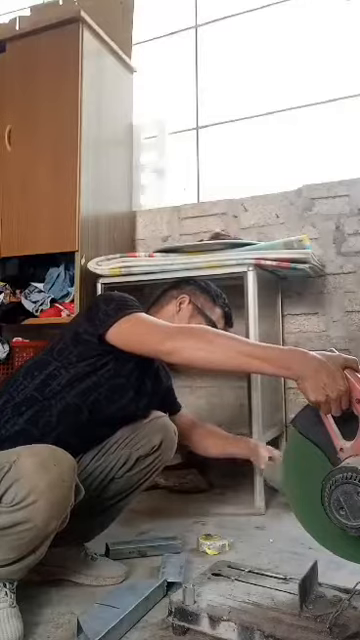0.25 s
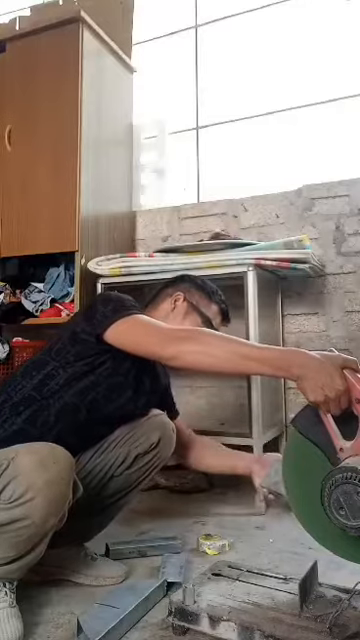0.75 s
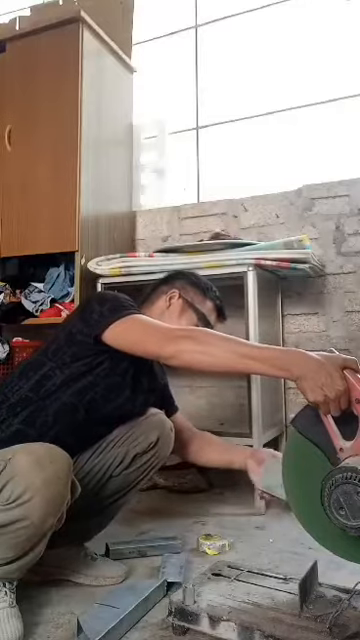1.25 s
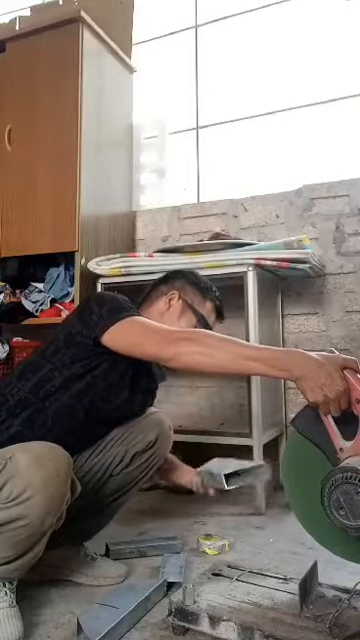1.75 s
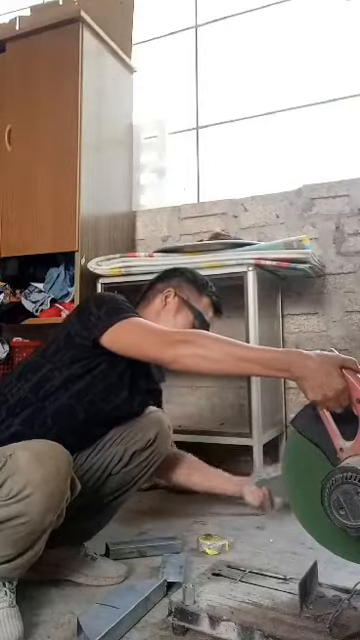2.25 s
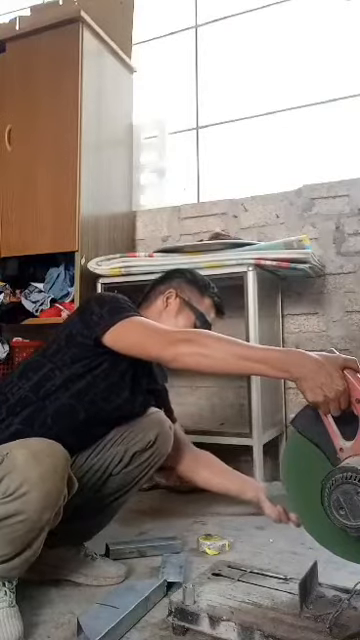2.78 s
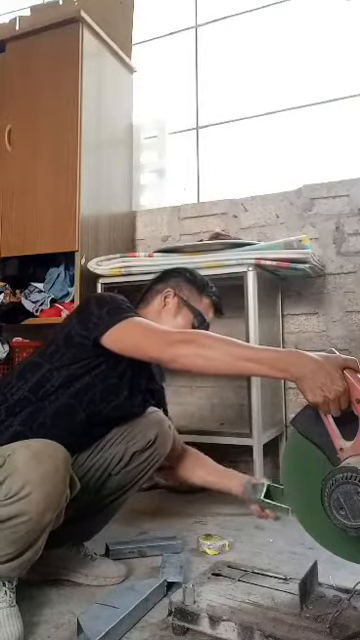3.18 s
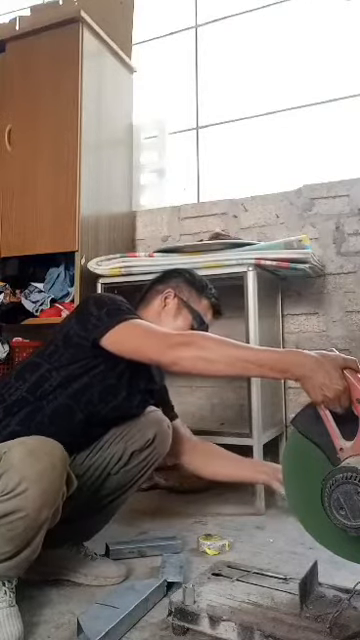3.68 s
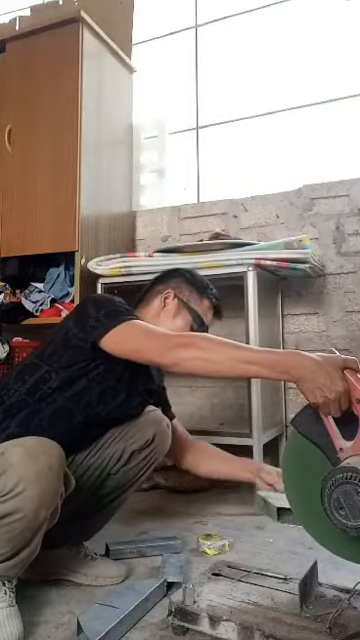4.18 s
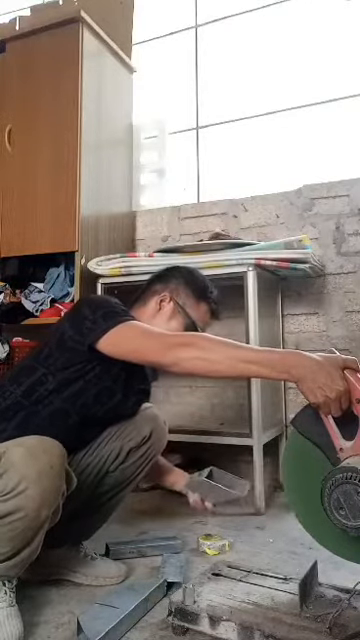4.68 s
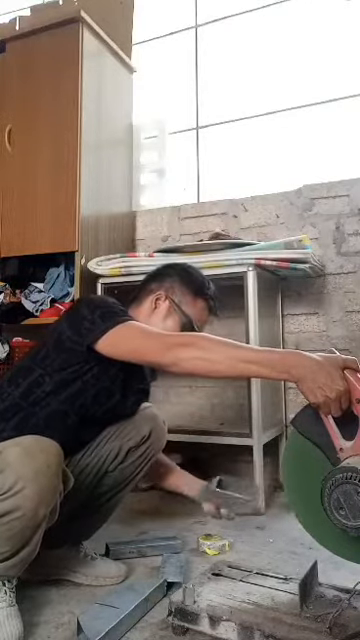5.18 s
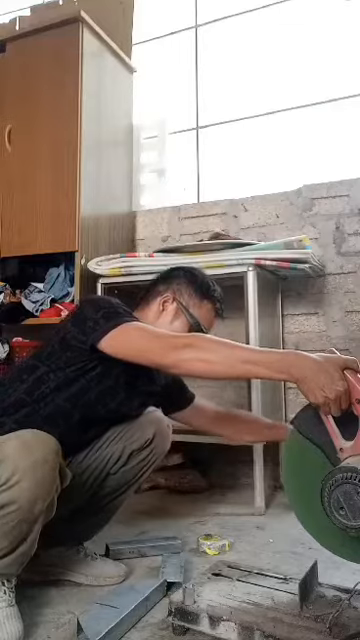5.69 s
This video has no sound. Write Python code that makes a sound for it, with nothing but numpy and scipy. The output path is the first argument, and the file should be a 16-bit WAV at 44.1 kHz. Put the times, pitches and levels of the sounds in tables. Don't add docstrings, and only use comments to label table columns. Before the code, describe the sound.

A steel tube is pressed on a spinning abrasive wheel again and again: bright hissing grit, ringing metal and low buffeting over a rough motor roar. Each release leaves a sinking whine and quick loose clatter; each trigger blip knocks, booms and whines upward. The sound is close, loud, slightly saturated and dull at the very top, with some lossy thinning and uneven stereo.

```python
import sys
import numpy as np
from scipy import signal
from scipy.io import wavfile
from scipy.ndimage import uniform_filter1d

SR = 44100
rng = np.random.default_rng(int(sys.argv[2]) if len(sys.argv) > 2 else 0)


def put_to_file(sound):
    columns = np.atleast_2d(sound).T
    safe = np.clip(columns, -1, 1)
    whole_steps = np.round(safe * 32767)
    wavfile.write(sys.argv[1], SR, whole_steps.astype(np.int16))


def natural_amplitude(level_db):
    exponent = np.asarray(level_db, float) / 20
    return 10 ** exponent


N = 261954
TIME = np.arange(N) / SR


def evened(x):
    return x / np.sqrt(np.mean(x.mean(0) ** 2) + 1e-20)


def steadied(x, size):
    power = uniform_filter1d(x ** 2, size=size)
    return evened(x / (power + .15 * np.mean(x ** 2)) ** .4)


def flicker(count, size):
    return evened(uniform_filter1d(rng.standard_normal((1, count)), size=size))


def read(points, hz):
    f, value = np.transpose(points)
    return np.interp(np.log(hz + 1), np.log(f + 1), value)


def track(rows, column):
    rows = np.array(rows)
    return np.interp(TIME, rows[:, 0], rows[:, column])


def noise(gain, same, lean, patchy_db, size=2048, count=N):
    frames, hz = 4 * count // size + 5, np.fft.rfftfreq(size, 1 / SR)
    a, b, c, d, patches = rng.standard_normal((frames, len(hz), 5)).T
    patches = uniform_filter1d(patches, size=size // 200, axis=0)
    patches = uniform_filter1d(patches, size=12288 // size, axis=1)
    alike = np.clip(read(same, hz), -1, 1)[:, None]
    left = a + 1j * b
    lag = np.exp(-1j * 0.29 * np.minimum(hz / 1000, 1.6))[:, None]
    right = lag * alike * left + np.sqrt(1 - alike ** 2) * (c + 1j * d)
    z = np.array([left, right]) * gain(hz)[:, None] * natural_amplitude(patchy_db * patches / patches.std())
    z = z * natural_amplitude(np.array([.5, -.5])[:, None, None] * read(lean, hz)[:, None])
    return evened(signal.istft(z, nperseg=size, noverlap=3 * size // 4)[1][:, :count])


def modes(table):
    f, width, db = np.transpose(table)
    return lambda hz: np.sqrt((natural_amplitude(2 * db) / (1 + (2 * (hz[:, None] - f) / width) ** 2) ** 1.42).sum(1))


def resonate(x, hz, width):
    turn, r = np.exp(2j * np.pi * np.cumsum(hz) / SR), np.exp(-np.pi * width / SR)
    return 2 * (turn * signal.lfilter([(1 - r) ** 2], [1, -2 * r, r * r], x / turn)).real


# (time [s], peak level [dB], frequency [Hz], T60 [s])
JOLTS = [
    (0.634, -6.5, 466, 0.19),
    (2.202, -8, 465, 0.44),
    (3.65, -6.5, 459, 0.28),
    (5.867, -7, 461, 0.19),
]


def surge():
    rows = np.array(JOLTS)
    lead_s, rise_s = 0.019, 0.011
    since = np.maximum(TIME - rows[:, :1] + lead_s, 0)
    length = 0.24 * rows[:, 3:] / 0.21
    return ((1 - np.exp(-since / rise_s)) * np.exp(-(since / length) ** 2)).sum(0)


# (time [s], lift over the resting rattle [dB])
CLASHES = [(0.414, -1.0), (0.467, 0.5), (0.534, -6.5), (0.572, -2.5), (0.614, 5.5), (0.673, -3.5),
           (0.8, -4.0), (0.868, 8.5), (1.759, 1.5), (1.814, 3.5), (1.88, 9.0), (1.932, 4.0), (2.005, 5.0),
           (2.064, 2.5), (2.118, 5.0), (2.19, 3.5), (2.247, -6.0), (2.305, -3.5), (2.379, -0.5),
           (2.459, 4.0), (2.518, 2.5), (2.571, 5.0), (2.628, 2.5), (2.7, 3.5), (2.753, 3.0), (3.433, 1.5),
           (3.493, 2.5), (3.554, 3.5), (3.634, 5.5), (3.699, -5.0), (4.44, 7.0), (4.496, 6.5), (4.551, 9.5),
           (4.606, -1.0), (4.655, 4.0), (4.712, 5.5), (4.764, 6.5), (4.817, 4.5), (4.885, 1.5),
           (4.933, 5.0), (4.987, 4.5), (5.031, 1.0), (5.077, 1.5), (5.138, -1.0), (5.193, 4.0),
           (5.257, 5.5), (5.31, 1.0), (5.375, 3.5), (5.417, -1.0), (5.475, 1.5), (5.554, 1.0), (5.616, 4.0),
           (5.665, 1.0), (5.705, 2.5), (5.765, 2.5), (5.81, 1.0), (5.853, 4.0)]


def rattle():
    rest, lift_gain = 0.67, 0.53
    t, hits = np.arange(4000) / SR, np.zeros(N)
    s, db = np.transpose(CLASHES)
    hits[(s * SR).astype(int)] = natural_amplitude(db)
    lift = signal.oaconvolve(hits, (1 - np.exp(-t / 0.003)) * np.exp(-(t / 0.026) ** 2))[:N]
    gain = rest + lift_gain * lift
    return gain / np.sqrt(uniform_filter1d(gain ** 2, size=8000))


# (frequency [Hz], density [dB per Hz])
RUMBLE = [(15, -53), (25, -53), (64, -6), (111, 3), (291, 3.5), (420, 6), (550, -59), (920, -120)]
# (time [s], load [0-1])
LOAD = [(0, 0.49), (.23, 0.61), (.45, 0), (.95, 0), (1.07, 0.69), (1.27, 0.53), (1.36, 0.84), (1.58, 1),
        (1.68, 0), (2.7, 0.5), (2.85, 0.62), (3.1, 0.67), (3.3, 0.68), (3.55, 0.4), (3.8, 0.65),
        (3.96, 0.85), (4.37, 0.76), (4.46, 0.09)]
# (frequency [Hz], left-right difference [dB])
LEAN = [(100, 0), (420, 3), (860, -2), (1400, 1.5), (3000, 4), (5000, 6.5), (6030, 13.5), (7300, 10.5),
        (7950, -2), (8600, -6), (9500, -12), (11000, 14.5)]


def rumble():
    sound = noise(lambda hz: natural_amplitude(read(RUMBLE, hz)), [(60, .2), (400, .15)], LEAN, patchy_db=3.5, size=4096)
    return sound * natural_amplitude(-73.5 + np.maximum(39.5 * track(LOAD, 1), 28 * surge()))


def strain_db():
    return 5 * track(LOAD, 1) + 3.5 * surge()


# (frequency [Hz], density [dB per Hz])
ROAR = [(25, -76), (45, -49), (108, -23.5), (355, -19), (480, -6), (1010, -8.5), (1500, -7), (1900, -9),
        (3380, -6.5), (6050, -8), (7100, -13), (8000, -23.5), (8700, -18), (9800, -31.5), (13100, -65.5)]
# (frequency [Hz], left-right likeness [-1 to 1])
SAME = [(60, 1), (180, 0.96), (510, 0.52), (1490, 0.049), (4350, 0.21), (12700, -0.24)]


def roar():
    sound = noise(lambda hz: natural_amplitude(read(ROAR, hz)), SAME, LEAN, patchy_db=2.0)
    return sound * natural_amplitude(-29.5 + strain_db()) * natural_amplitude(1.3 * flicker(N, 70))


# (frequency [Hz], width [Hz], level [dB])
BASE = [(410, 30, -10), (463, 22, 0), (560, 50, -9), (631, 22, -3), (845, 16, -12), (929, 14, -7),
        (1080, 35, -12)]
# (frequency [Hz], left-right likeness [0-1])
GUARD_SAME = [(400, 1), (1000, 0.82), (1600, 0.51), (3000, 0.52)]
# (time [s], contact [dB])
CONTACT = [(0, 0), (.6, -2), (.82, -3.5), (.89, 3.5), (.95, -1.5), (1.08, 5), (1.3, -12.5), (1.6, -0.5),
           (1.7, -3.5), (2.2, 5), (2.4, -3.5), (2.55, 5), (2.85, 8.5), (3.12, 5), (3.85, 2), (4.3, -0.5),
           (4.46, 4), (5.0, 0.5)]
BOOM_HOLD_S = .05


def drone():
    sound = noise(modes(BASE), GUARD_SAME, LEAN, patchy_db=5.0, size=4096)
    sound = sound / (uniform_filter1d(sound.mean(0) ** 2, size=2500) + 0.1) ** 0.3
    sound = sound * natural_amplitude(-35 - 8.5 * track(LOAD, 1) + 8.5 * surge() + 0.47 * track(CONTACT, 1))
    since = TIME - np.array(JOLTS)[:, :1]
    taken = np.exp(-((since - BOOM_HOLD_S / 2) / BOOM_HOLD_S) ** 4).sum(0)
    return sound * (1 - .85 * taken)


# (time [s], gear mesh [Hz])
MESH = [(0, 1448), (.61, 1304), (.8, 1669), (1.25, 1553), (1.62, 1436), (2.17, 1362), (2.4, 1662),
        (2.8, 1591), (3.3, 1473), (3.62, 1475), (3.8, 1652), (4.42, 1603), (5.0, 1490), (5.84, 1393),
        (5.94, 1580)]
# (frequency [Hz], width [Hz], level [dB])
GUARD = [(1290, 22, -4), (1358, 24, 1), (1445, 14, -2), (1493, 12, -1), (1554, 14, 1), (1608, 14, 1),
         (1740, 50, -13)]


def whine():
    guard = noise(modes(GUARD), GUARD_SAME, LEAN, patchy_db=4.0, size=4096)
    sound = resonate(guard, track(MESH, 1), 285) + 0.29 * guard
    sound = sound / np.sqrt(uniform_filter1d(sound.mean(0) ** 2, size=4000))
    return sound * natural_amplitude(-32.5 + track(CONTACT, 1) + 1.5 * surge() - 5.5 * track(LOAD, 1))


# (multiple of the mesh [-], width [Hz], coasting level [dB], powered level [dB])
ORDERS = [(.385, 14, -43, -60), (2.0, 90, -52, -43), (2.52, 40, -52, -56)]


def speed_lines(white):
    mesh_hz = track(MESH, 1)
    powered = uniform_filter1d(1. * (np.gradient(mesh_hz) > 0), size=1500)
    lines = np.zeros((2, N))
    for multiple, width, coast_db, power_db in ORDERS:
        line = steadied(resonate(white, multiple * mesh_hz, width), size=1500)
        lines += natural_amplitude(coast_db + (power_db - coast_db) * powered) * line
    lines = lines * np.clip((mesh_hz - 1480) / 60, .2, 1)
    lines = lines * natural_amplitude(19.5 * np.exp(-(TIME / 0.19) ** 4))
    return lines * natural_amplitude(strain_db() - 2.5 * track(LOAD, 1) - 1.0)


# (time [s], frequency [Hz], level [dB])
GROAN = [
    (2.95, 1113, -65.5),
    (3.0, 1097, -45),
    (3.3, 1067, -45),
    (3.35, 1050, -57),
    (3.88, 1085, -65),
    (3.93, 1046, -35),
    (4.1, 1060, -40),
    (4.15, 1037, -68),
]


def groan(white):
    return natural_amplitude(track(GROAN, 2)) * steadied(resonate(white, track(GROAN, 1), 17), size=1500)


def plate(white, clash):
    hz, width_hz = 3380, 400
    ring = evened(signal.lfilter(*signal.iirpeak(hz, hz / width_hz, SR), white))
    return natural_amplitude(-44.5) * ring * clash ** 2.5


def machine():
    clash = rattle()
    white = noise(np.ones_like, SAME, LEAN, patchy_db=2.0)
    shaken = roar() * clash ** 0.44 + drone() * clash ** 0.33 + whine() * clash
    return rumble() + shaken + speed_lines(white) + groan(white) + plate(white, clash)


# (time [s], peak level [dB], frequency [Hz], T60 [s])
TAKE_UP = [
    (0.611, -24.5, 1335, 0.186),
    (2.171, -22.5, 1330, 0.26),
    (3.622, -20, 1354, 0.15),
    (5.857, -22, 1366, 0.15),
]


def jolts():
    out, t = np.zeros((2, N + SR)), np.arange(SR // 2) / SR
    tail = .5
    for s, db, hz, t60 in JOLTS:
        boom = natural_amplitude(db - 9.0 - 60 * t / t60) * (1 - np.exp(-t / 0.0038)) * np.sin(2 * np.pi * hz * t)
        boom = boom * (tail + (1 - tail) * np.exp(-(t / BOOM_HOLD_S) ** 4))
        boom = boom * (1 + 0.33 * np.cos(2 * np.pi * 24 * t))
        out[:, round(s * SR):][:, :len(t)] += boom * natural_amplitude([[1.8], [-1.8]])
    for s, db, hz, t60 in TAKE_UP:
        ring = np.sin(2 * np.pi * hz * t) + natural_amplitude(-9.5) * np.sin(4 * np.pi * hz * t)
        uneven_teeth = natural_amplitude(3.1 * flicker(len(t), 300))
        swell = natural_amplitude(db - 60 * t / t60) * (1 - np.exp(-t / 0.0013))
        out[:, round(s * SR):][:, :len(t)] += swell * ring * uneven_teeth
    return out[:, :N]


# (time [s], frequency [Hz], level [dB])
SQUEAL = [
    (.88, 5070, -60),
    (.93, 5070, -35),
    (1.12, 5080, -25),
    (1.32, 5118, -25),
    (1.45, 5120, -29),
    (1.62, 5120, -31),
    (1.72, 5120, -55),
]


def squeal():
    drift = uniform_filter1d(rng.standard_normal((N, 2)).T, size=900)
    pitch, level = (evened(row[None])[0] for row in drift)
    turns = np.cumsum(track(SQUEAL, 1) + 6 * pitch) / SR
    start, end = SQUEAL[0][0], SQUEAL[-1][0]
    on = abs(TIME - (start + end) / 2) < (end - start) / 2
    return on * natural_amplitude(track(SQUEAL, 2) + 3 * level + [[3.5], [-3.5]]) * np.sin(2 * np.pi * turns)


# (time [s], pressure [dB], relative level of the lower grit [dB])
PRESS = [
    [(0.0, -23.5, -1), (0.274, -20, -4), (0.32, -23.5, -18), (0.374, -35.5, -12), (0.45, -52, -20)],
    [(0.85, -51, -1), (.92, -32.5, 2.5), (1.108, -19.5, -4), (1.14, -22, -9), (1.19, -20, -3.5),
     (1.298, -22.5, 4), (1.345, -20, -6), (1.6, -19.5, -2), (1.75, -47, -3.5)],
    [(2.795, -44, -10), (2.812, -23.5, -2), (2.844, -20.5, -7), (2.886, -26.5, -2.5), (2.912, -21, -3),
     (3.23, -17.5, -3), (3.296, -19, -9), (3.352, -32.5, -23), (3.42, -54, -15)],
    [(3.79, -41, 7), (3.846, -19, 0.5), (3.89, -30.5, -6.5), (3.944, -19, 4.5), (4.012, -20, -25),
     (4.045, -18.5, -1.5), (4.33, -17.5, -7), (4.385, -15.5, -4), (4.54, -42, -1)],
]
# (frequency [Hz], density [dB per Hz])
GRIT = [(1060, -99), (1800, -17), (2270, -17), (2710, -12.5), (2920, -9.5), (4200, -7), (4800, -8.5),
        (5180, 0), (5400, -2.5), (6430, 0), (8110, -10), (8960, -10), (13100, -31.5)]
# (frequency [Hz], width [Hz], level [dB])
RING_A = [(2710, 39, -10), (3100, 41, -6), (3600, 40, -6), (4050, 110, -5), (4480, 120, -6), (5150, 46, -3),
          (5360, 31, -7), (5750, 39, 0), (6240, 88, -6), (6810, 55, -5), (7030, 26, -4), (7610, 46, -8),
          (7780, 33, -17), (8740, 89, -13)]
RING_B = [(3590, 130, -14), (4180, 60, -12), (4335, 21, -8), (5078, 30, -7), (5118, 12, -5), (5340, 35, -7),
          (5765, 55, -4), (6235, 30, -5), (6510, 160, -5), (7620, 50, -9), (7770, 20, -4), (8690, 85, -14)]
RING_C = [(2750, 56, -8), (3180, 52, -7), (3930, 62, -5), (4330, 40, -7), (4570, 97, -7), (4820, 43, -8),
          (5070, 49, -2), (5370, 87, -5), (5660, 35, -4), (6020, 26, -2), (6370, 150, 0), (7550, 88, -10),
          (8010, 120, -13), (8760, 150, -10)]
RING_D = [(2710, 140, -9), (3080, 26, -10), (3420, 180, -11), (4320, 54, -6), (4530, 87, -8),
          (5080, 73, -1), (5340, 47, -2), (5720, 63, -1), (6350, 250, 0), (6570, 21, -1), (7900, 51, -10),
          (8700, 250, -10), (8960, 33, -10)]
RING_DB = [4.5, 1, -1.5, -1.5]
# (frequency [Hz], left-right likeness [0-1])
CUT_SAME = [(60, 0.45), (230, 0.54), (870, 0.11), (3330, 0.077), (12700, 0.02)]
# (frequency [Hz], left-right difference [dB])
CUT_LEAN = [(100, 9), (1400, 3), (4100, 3), (6030, 9.5), (7300, 11), (7950, -3.5), (8700, -11.5),
            (9500, -2), (11000, -0.5)]


def grinding():
    out = np.zeros((2, N))
    teeth = 42
    turn = 2 * np.pi * (np.cumsum(track(MESH, 1)) / teeth / SR + 0.21)
    bump = np.cos(turn) + .4 * np.cos(2 * turn)
    lower = lambda hz: 1 / (1 + (hz / 4800) ** 16)
    crowd_db = 2.5 * uniform_filter1d(rng.standard_normal(1025), size=2)
    grit = lambda hz: natural_amplitude(read(GRIT, hz) + crowd_db[::1024 // (len(hz) - 1)])
    low = noise(lambda hz: grit(hz) * np.sqrt(lower(hz)), CUT_SAME, CUT_LEAN, patchy_db=4.0, size=1024)
    high = noise(lambda hz: grit(hz) * np.sqrt(1 - lower(hz)), CUT_SAME, CUT_LEAN, patchy_db=2.0)
    grain = natural_amplitude(1.6 * flicker(N, 45))
    firm_db, chatter_per_db = -26.5, 1.65
    for rows, ring, ring_db in zip(PRESS, [RING_A, RING_B, RING_C, RING_D], RING_DB):
        a, b = round(rows[0][0] * SR), round(rows[-1][0] * SR)
        tube = noise(modes(ring), CUT_SAME, CUT_LEAN, patchy_db=2, size=4096, count=b - a)
        tube = np.pad(natural_amplitude(ring_db) * tube, ((0, 0), (a, N - b)))
        sound = (high + low * natural_amplitude(track(rows, 2)) + tube) * grain
        press_db = track(rows, 1)
        bump_db = np.clip(chatter_per_db * (firm_db - press_db), 1.2, 4)
        sound = sound * natural_amplitude(press_db - 2.0 + bump_db * bump)
        since = np.arange(a, b) - a + (a < 1) * SR
        fade = np.minimum(1, np.minimum(since, b - np.arange(a, b)) / 500)
        out[:, a:b] += sound[:, a:b] * fade
    return out


def scene():
    return machine() + jolts() + squeal() + grinding()


# (frequency [Hz], share dropped left [0-1], share dropped right [0-1])
DROPPED = [(1500, 0, 0), (1900, .24, .24), (2600, .23, .23), (3000, .12, .12), (3500, .17, .17),
           (4200, .21, .21), (4500, .12, .12), (4800, .34, .34), (5300, .02, .06), (7000, .03, .2),
           (7500, .4, .3), (7800, .7, .66), (8100, .72, .66), (8400, .62, .05), (9400, .7, .1),
           (9900, .82, .8), (11000, .74, .8), (11800, .89, .9), (12600, .94, .95), (13200, .97, .97)]


def thinned(x):
    window = signal.windows.cosine(2048)
    hz, _, z = signal.stft(x, SR, window, nperseg=2048, noverlap=1024)
    power = abs(z) ** 2 + 1e-30
    edges = np.r_[0:240:8, 240:1025:16]
    widths = np.diff(np.r_[edges, 1025])
    band = np.add.reduceat(power, edges, axis=1) / widths[:, None]
    reach = natural_amplitude(-.15 * abs(np.arange(-200, 201)))
    neighbours = signal.fftconvolve(power.mean(0), reach[:, None], "same", axes=0)[edges + widths // 2]
    need = np.log(band / abs(neighbours))
    middle = (abs(hz[edges] - 3800) < 1300)[:, None]
    need = need - .2 * np.log(power.mean((0, 1))) * middle
    shared, own = rng.standard_normal(band.shape[::-1]).T
    chance = uniform_filter1d(np.array([shared, .9 * shared + .44 * own]), size=3, axis=2)
    need = uniform_filter1d(need, size=2, axis=2) + np.clip(hz[edges] / 2000, 1.7, 2.5)[:, None] * chance
    rank = need.argsort(2).argsort(2) / need.shape[2]
    f, *shares = np.transpose(DROPPED)
    share = np.array([np.interp(hz[edges], f, s) for s in shares])[..., None]
    z = z * np.repeat((rank >= share) / np.sqrt(1 - .8 * share), widths, axis=1)
    floor = natural_amplitude(np.where(hz > 9700, 1, -5))[:, None] * np.repeat(band, widths, axis=1)
    z = z * (power > floor * (hz > 1750)[:, None])
    return signal.istft(z, SR, window, nperseg=2048, noverlap=1024)[1][:, :N]


def roll_off(x):
    return signal.sosfilt(signal.butter(12, 13290, fs=SR, output="sos"), x)


def record(dry):
    top, knee = .74, .5
    over = np.maximum(abs(dry) - knee, 0)
    limited = dry - np.sign(dry) * (over - (top - knee) * np.tanh(over / (top - knee)))
    mix = np.clip(thinned(limited), -.88, .88)
    return roll_off(mix)


dry = scene()
out = record(dry)
put_to_file(out)
```